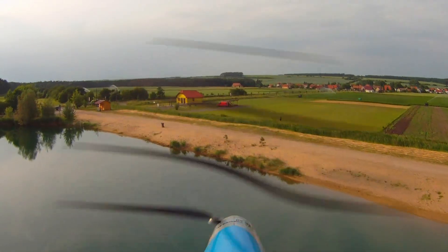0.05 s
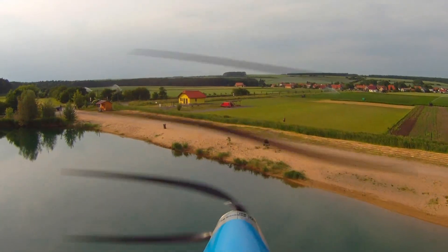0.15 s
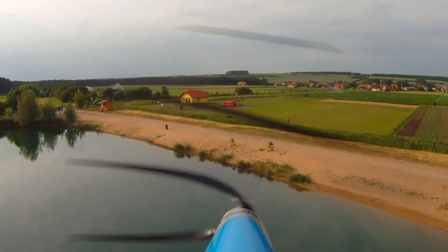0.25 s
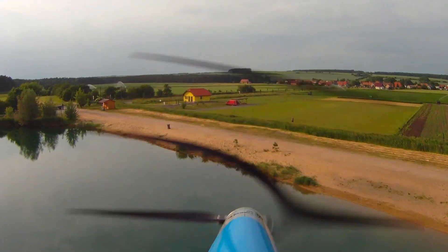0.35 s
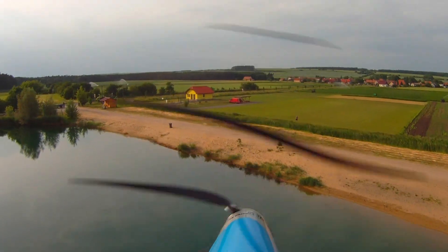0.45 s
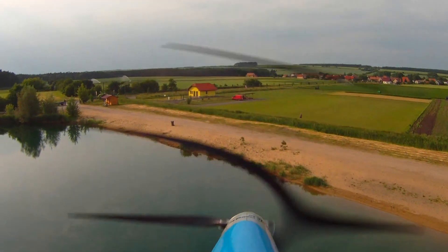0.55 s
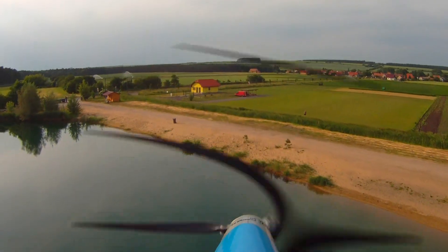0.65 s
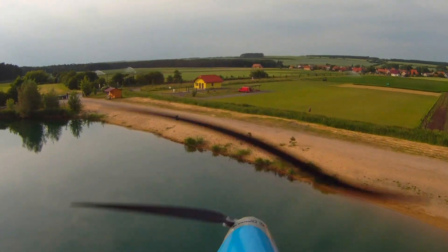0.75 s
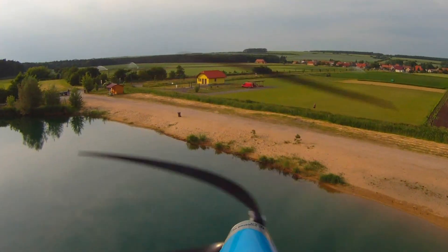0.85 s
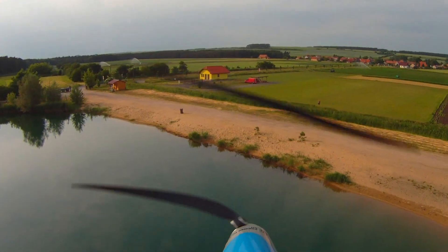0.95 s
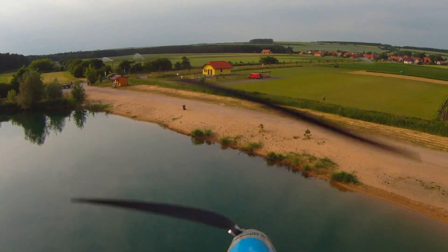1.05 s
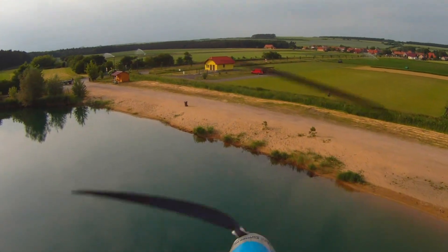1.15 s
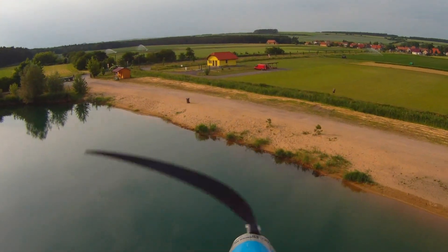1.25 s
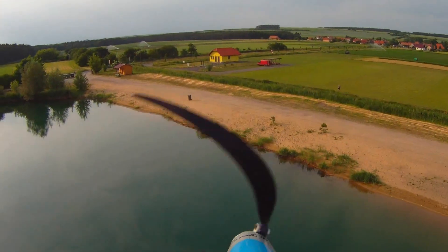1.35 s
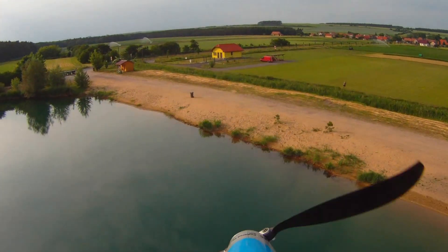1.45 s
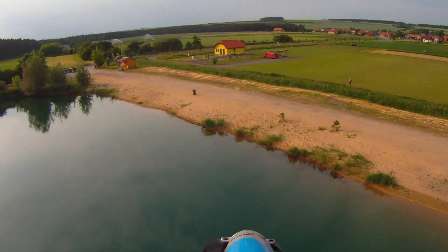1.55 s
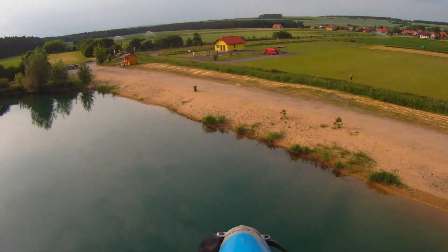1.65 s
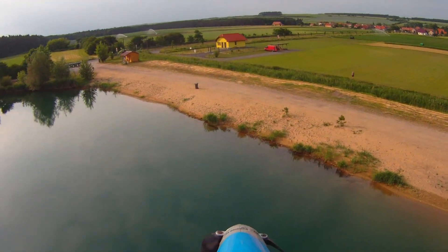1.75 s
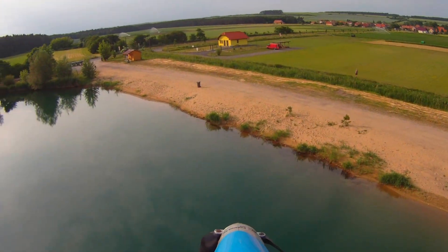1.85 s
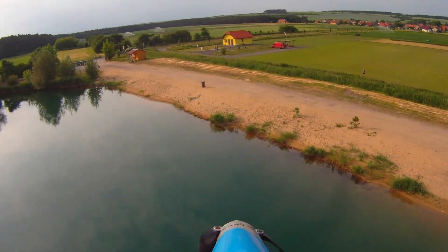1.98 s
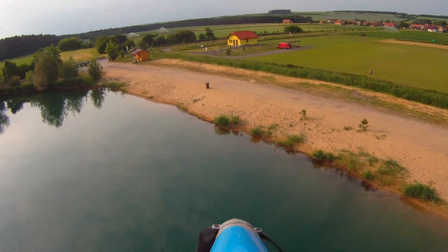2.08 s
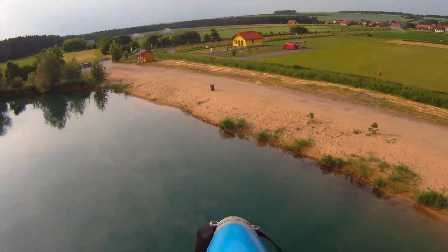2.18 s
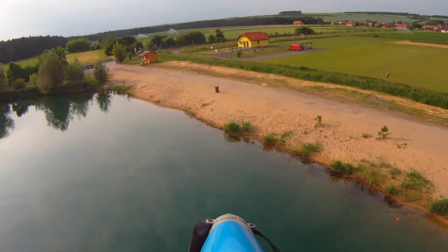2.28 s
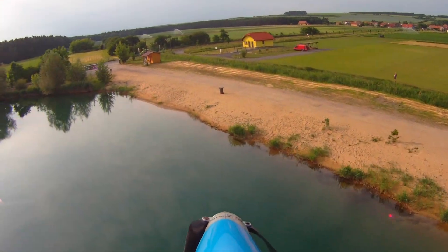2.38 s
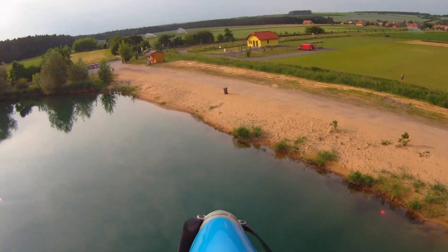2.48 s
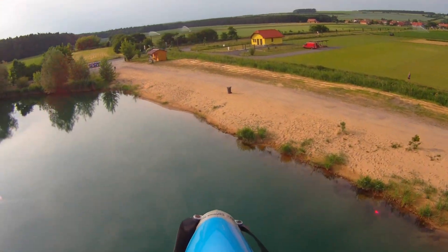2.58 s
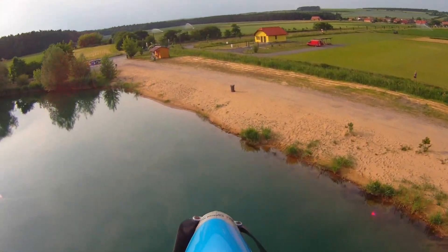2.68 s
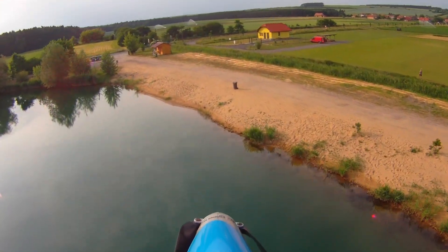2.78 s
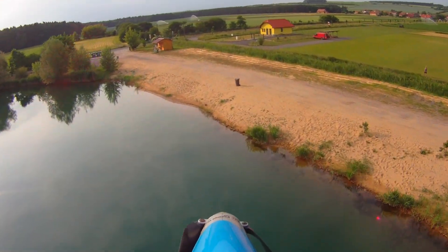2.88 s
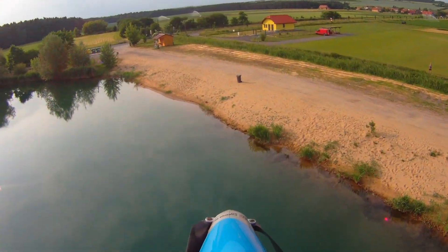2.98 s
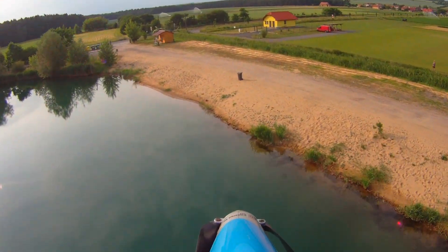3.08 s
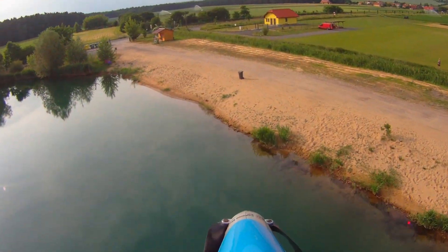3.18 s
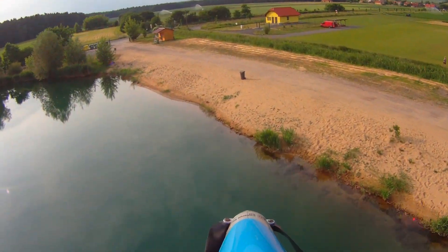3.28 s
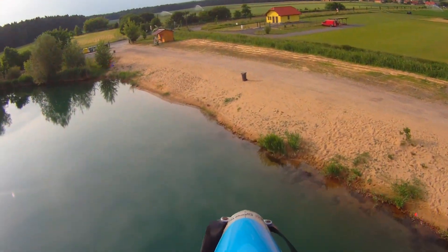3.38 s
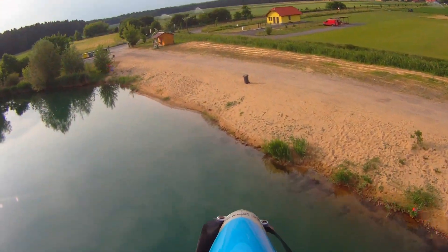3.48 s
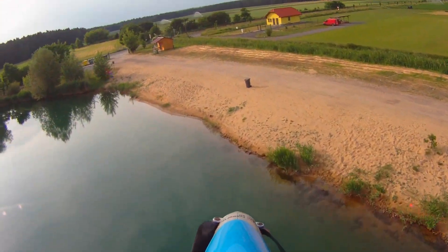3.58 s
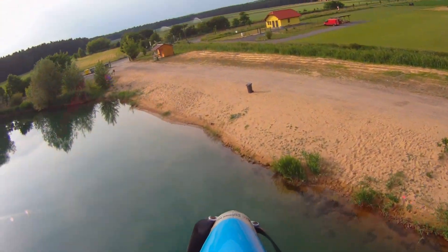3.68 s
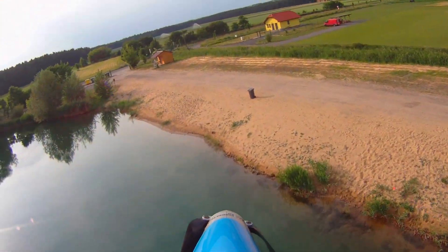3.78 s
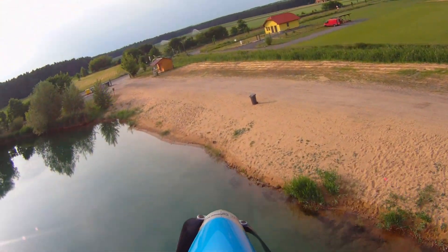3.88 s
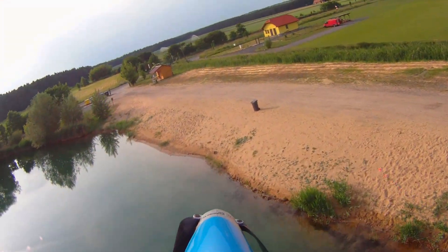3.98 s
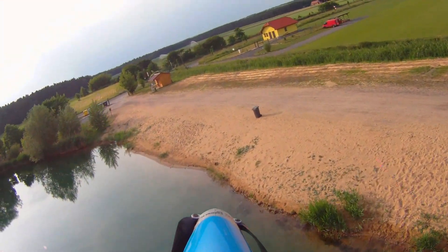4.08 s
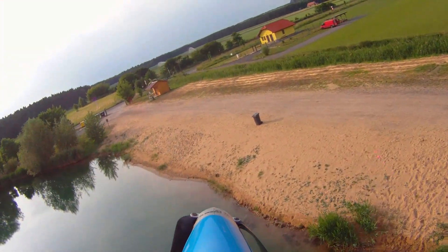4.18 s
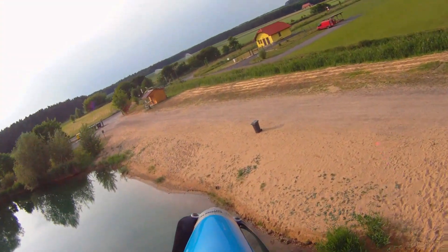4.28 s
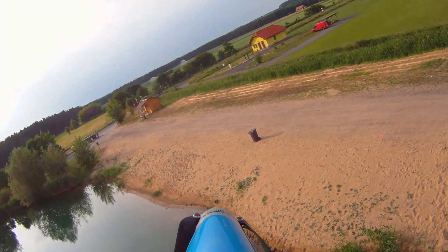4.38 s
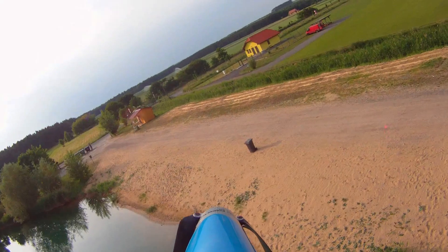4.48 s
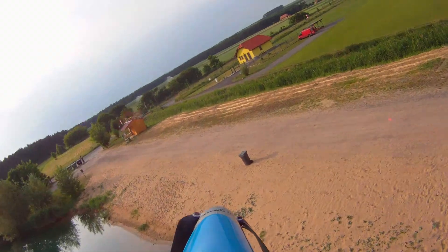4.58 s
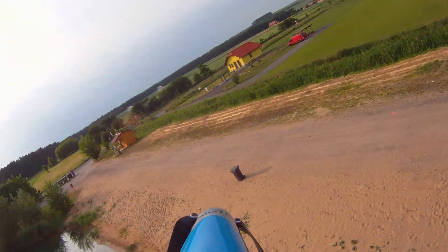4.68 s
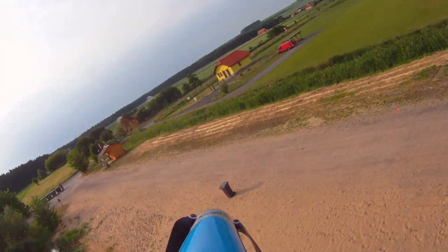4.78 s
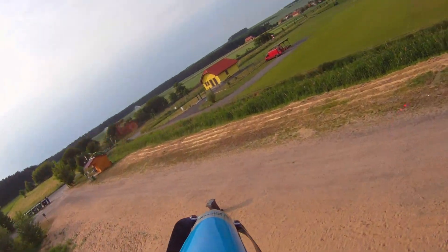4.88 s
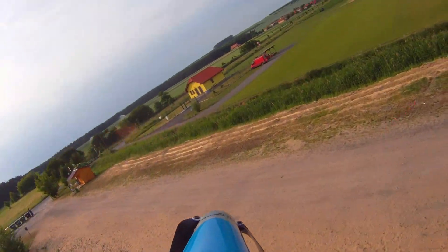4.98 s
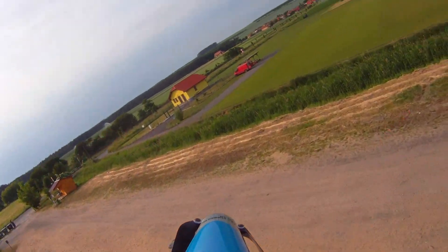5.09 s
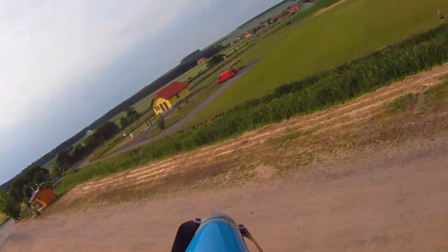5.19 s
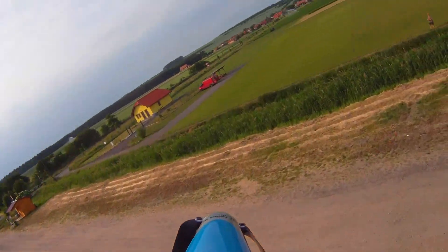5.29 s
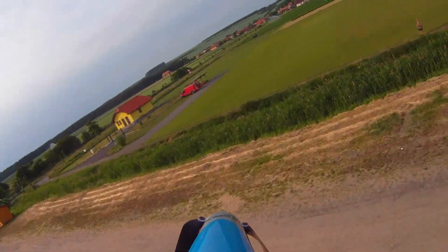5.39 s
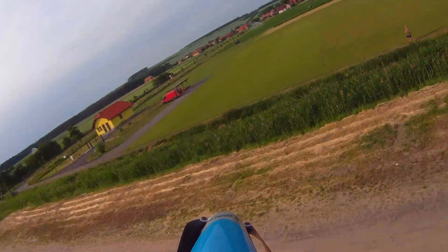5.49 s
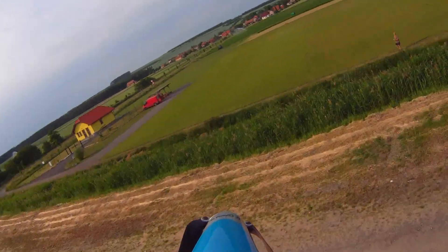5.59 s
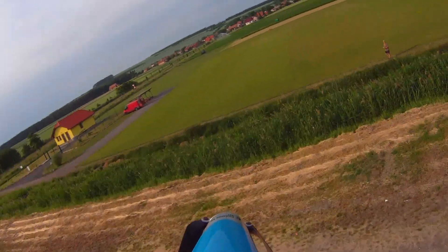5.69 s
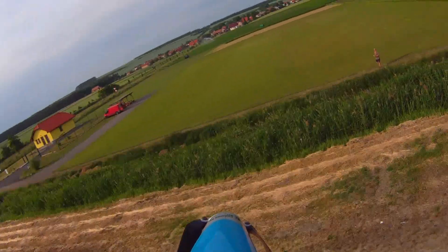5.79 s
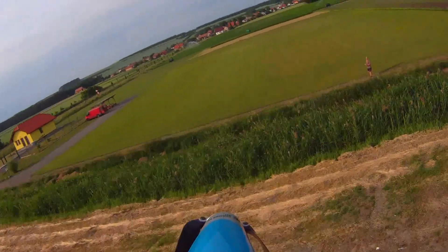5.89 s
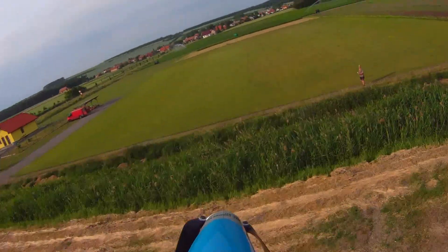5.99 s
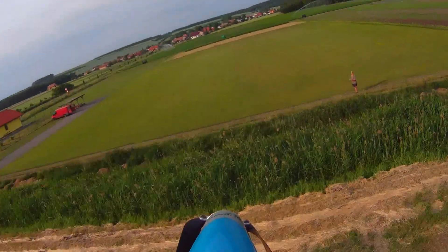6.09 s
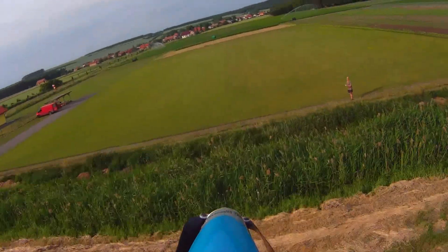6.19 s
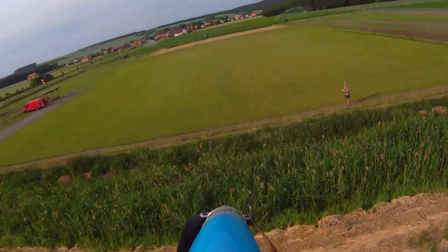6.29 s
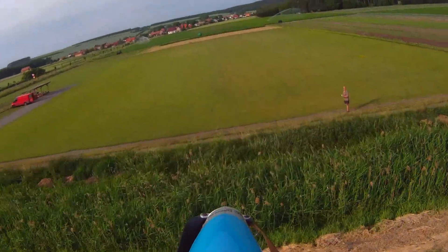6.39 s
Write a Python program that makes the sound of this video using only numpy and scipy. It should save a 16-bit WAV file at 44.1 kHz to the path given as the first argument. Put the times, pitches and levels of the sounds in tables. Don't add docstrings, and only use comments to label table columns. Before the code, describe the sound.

A buzzing model-plane motor with a thin high whistle loses power almost at once, its pitch falling and rattling to a standstill by about a second and a half. Soft foam thuds and small gritty clicks mark the folding blades. The glide that follows is windy, close and boxy, heard from a microphone encased on the plane, with turbulence swelling and easing over a constant hiss and hum.

```python
import sys
import numpy as np
from scipy import signal
from scipy.io import wavfile
from scipy.ndimage import uniform_filter1d

SR = 44100
rng = np.random.default_rng(int(sys.argv[2]) if len(sys.argv) > 2 else 0)


def to_wav(s):
    ch = np.atleast_2d(s).T
    pcm = np.round(np.clip(ch, -1, 1) * 32767)
    wavfile.write(sys.argv[1], SR, pcm.astype(np.int16))


def volts_from_decibels(level):
    exponent = np.asarray(level, float) / 20
    return 10 ** exponent


N = 284445
MOTOR_N = int(1.7 * SR)


def rms_one(x):
    return x / np.sqrt(np.mean(x ** 2) + 1e-20)


def in_time(rows):
    s, *columns = np.transpose(rows)
    return [np.interp(np.arange(N) / SR, s, c) for c in columns]


def ramp(start_s, length_s):
    return np.clip((np.arange(N) / SR - start_s) / max(length_s, 1e-3), 0, 1)


def drift(rate_hz):
    r = np.exp(-128 * np.pi * rate_hz / SR)
    slow = signal.lfilter([1], [1, -2 * r, r * r], rng.standard_normal(N // 64 + 502))[500:]
    return np.interp(np.arange(N) / 64, np.arange(len(slow)), rms_one(slow))


def band(x, low_hz, high_hz, order=2):
    return signal.sosfilt(signal.butter(order, [low_hz, high_hz], "band", fs=SR, output="sos"), x)


def resonate(force, modes, direct_db):
    out = volts_from_decibels(direct_db) * force
    for k, (hz, width_hz, level_db) in enumerate(modes):
        r = np.exp(-np.pi * width_hz / SR)
        ring = signal.lfilter([1, 0, -1], [1, -2 * r * np.cos(2 * np.pi * hz / SR), r * r], force)
        out = out + (-1) ** k * volts_from_decibels(level_db) * (1 - r * r) / 2 * ring
    return out


def rush(spectrum, ref_hz, shared_db, patchy_db):
    points_hz, levels_db = np.transpose(spectrum)
    count = int(3 * np.log2(points_hz[-1] / points_hz[0]))
    edges_hz = np.geomspace(points_hz[0], points_hz[-1], count)
    out, together, white = 0, drift(84), rng.standard_normal((2, N))
    for k, (low_hz, high_hz) in enumerate(zip(edges_hz, edges_hz[1:])):
        level_db = np.interp(np.log(low_hz * high_hz) / 2, np.log(points_hz), levels_db)
        narrow = band(band(white[k % 2], low_hz, high_hz), low_hz * .9, high_hz * 1.1)
        flicker_db = shared_db * together + patchy_db * drift(11.1)
        out = out + volts_from_decibels(level_db + flicker_db) * narrow
    return out / np.std(band(out, *ref_hz))


SWITCH_HZ = 8021.5


def tones(lines, turns, waver_db):
    t, out = np.arange(len(turns)) / SR, 0
    for switch, order, level_db in lines:
        phase = 2 * np.pi * (switch * SWITCH_HZ * t + order * turns + rng.random())
        out = out + volts_from_decibels(level_db + waver_db * drift(22)[:len(t)]) * np.sin(phase)
    return out


def shaft_tones(orders, turns, waver_db):
    return tones([(0, order, level_db) for order, level_db in orders], turns, waver_db)


# (time [s], speed [turns/s])
SPEED = [
    (.2, 172.57),
    (.265, 168),
    (.445, 125),
    (.57, 108.5),
    (.82, 90.5),
    (.97, 73.5),
    (1.1, 69.5),
    (1.3, 54),
    (1.5, 30),
]
# (time [s], magnet pull [dB], rocking [dB])
ROTOR = [
    (.3, -39, -62),
    (.42, -45, -49),
    (.535, -49.5, -43),
    (.585, -46.5, -46.5),
    (.68, -47, -38.5),
    (.9, -45, -52),
    (1.08, -36, -34.5),
    (1.33, -53.5, -50),
    (1.49, -50, -55),
]
INERTIA_S = .05
STOP_S, STOP_FADE_S = 1.54, 0.05


def rotor():
    speed_hz = uniform_filter1d(in_time(SPEED)[0], size=int(INERTIA_S * SR), mode="nearest")
    octaves = np.log2(speed_hz / speed_hz[0])
    return speed_hz, octaves, *in_time(ROTOR), -50 * ramp(STOP_S, STOP_FADE_S)


# (frequency [Hz], density [dB/Hz])
HISS = [(30, -51), (60, -46.5), (160, -21), (300, -15.5), (1100, -15), (2200, -19), (3000, -25.5),
        (4200, -24.5), (5400, -26), (6300, -29), (8500, -33.5), (11000, -42.5), (12700, -43)]
HISS_DB, HISS_FOLLOWS = -58, 0.28
CALM_DB, PROP_HISS_DB = -70, -55.5


def boundary_hiss(eddy_db, octaves, stop_db):
    smooth = volts_from_decibels(HISS_DB + HISS_FOLLOWS * (np.maximum(eddy_db, CALM_DB) + 48.5))
    gain = np.hypot(smooth, volts_from_decibels(PROP_HISS_DB + 2.7 * octaves + stop_db))
    hiss = rush(HISS, (2800, 5500), shared_db=1.34, patchy_db=-0.48)
    cavity = band(band(rng.standard_normal(N), 4480, 5070), 4120, 5500)
    return volts_from_decibels(-1.5) * gain * (hiss + volts_from_decibels(-3.5) * rms_one(cavity))


# (frequency [Hz], width [Hz], level [dB])
WING_HUM = [
    (1271.6, 31.5, 4),
    (1407, 29, 2.5),
    (1500, 66, -4),
    (1612, 143, -5.5),
    (2004, 420, -11.5),
]
HUM_DB, PROP_HUM_DB, HUM_PER_OCTAVE_DB = -48, -45, 9
SHAKE_HUM_DB = 2
HUM_YIELDS = 0.095


def wing_hum(eddy_db, octaves, magnet_db, stop_db):
    propeller = volts_from_decibels(PROP_HUM_DB + HUM_PER_OCTAVE_DB * octaves)
    driven = np.hypot(propeller, volts_from_decibels(magnet_db + SHAKE_HUM_DB)) * volts_from_decibels(stop_db)
    gain = np.hypot(volts_from_decibels(HUM_DB - HUM_YIELDS * (eddy_db + 53)), driven)
    pressure = volts_from_decibels(1.9 * drift(26)) * band(rng.standard_normal(N), 1087, 2740)
    return volts_from_decibels(-3.5) * gain * rms_one(resonate(pressure, WING_HUM, direct_db=-38))


# (frequency [Hz], density [dB/Hz])
WASH_COLOUR = [(2000, 2), (5000, -19), (6500, 5), (7500, -7), (10000, -14), (11500, -20), (15000, -23)]
WASH_DB, WASH_END_S, WASH_FADE_S = -74, .53, .07


def propeller_wash():
    pulling = 1 - ramp(WASH_END_S, WASH_FADE_S)
    return volts_from_decibels(WASH_DB + 14) * pulling * rush(WASH_COLOUR, (8500, 11000), shared_db=2.5, patchy_db=-2.0)


# (frequency [Hz], density [dB/Hz])
EDDIES = [(21, -59.5), (35, -31), (96, -20), (122, -28), (221, -22.5), (449, -0.5), (689, 4.5), (1200, 2),
          (1320, -1.5), (2270, -19.5), (3000, -19), (3900, -35.5), (6600, -120)]


def port_eddies(eddy_db, boom_db):
    eddies = volts_from_decibels(eddy_db - 2.5) * rush(EDDIES, (550, 1050), shared_db=-1.25, patchy_db=1.5)
    boom = rms_one(band(rng.standard_normal(N), 131, 730))
    return eddies + volts_from_decibels(eddy_db + boom_db - 10 + 1.2 * drift(30)) * boom


# (time [s], eddies [dB], boom re eddies [dB])
FLOW = [(0, -45.5, -2), (.6, -44.5, -17), (1.1, -46.5, 0.5), (1.6, -46.5, -4.5), (2.45, -45.5, -15),
        (2.73, -47.5, -13), (2.77, -54.5, 4), (3.25, -62, 9), (3.29, -50.5, -2), (3.85, -46, -21),
        (3.96, -50, -8), (3.99, -55, -1), (4.6, -63, 3.5), (5.21, -66, 0), (5.25, -50, 1),
        (5.65, -45.5, -30), (6.1, -46.5, 5.5), (6.45, -50, 4.5)]


def slipstream():
    eddy_db, boom_db = in_time(FLOW)
    _, octaves, magnet_db, _, stop_db = rotor()
    steady = boundary_hiss(eddy_db, octaves, stop_db) + wing_hum(eddy_db, octaves, magnet_db, stop_db)
    return port_eddies(eddy_db, boom_db) + steady + propeller_wash()


# (time [s], peak [dB], brightness [dB], ring [Hz], ring t60 [s])
KNOCKS = [(0.909, -33, -44, 1130, 0.032), (1.0405, -19, -40, 1420, .016), (1.068, -20, -40, 1410, .02),
          (1.0965, -19, -40, 1390, .024), (1.085, -26, -41, 1355, 0.05), (1.261, -43, -30, 1410, 0.026),
          (1.387, -35, -29, 1350, 0.034), (1.4782, -28.5, -30, 1390, .033), (1.513, -36, -30, 1400, 0.048),
          (1.553, -44, 4, 1280, .02), (1.735, -37.5, -26, 1400, 0.1), (1.747, -29.5, -20, 1500, 0.013),
          (1.7545, -33, 0, 2240, 0.036), (1.756, -23.5, -20, 1360, 0.058), (1.783, -34.5, 1.5, 2070, .039),
          (1.79, -29.5, -19, 1364, .04), (1.819, -36, -14, 1025, 0.013), (1.918, -36, -30, 1390, 0.056)]
GIVE_S, GIVE_S_PER_DB = .004, .0003


def knocks():
    out, t = np.zeros(N), np.arange(4000) / SR
    grits = rng.standard_normal((len(KNOCKS), 4000))
    for (s, peak_db, bright_db, ring_hz, t60_s), grit in zip(KNOCKS, grits):
        rise_s = max(GIVE_S + GIVE_S_PER_DB * (peak_db + 22), .0015)
        swell = np.sin(np.pi / 2 * np.minimum(t / rise_s, 1)) ** 2
        decay = volts_from_decibels(-60 * np.maximum(t - rise_s, 0) / t60_s)
        ring = swell * decay * np.sin(2 * np.pi * ring_hz * t)
        crack = volts_from_decibels(bright_db) * band(grit * swell * np.exp(-t / 0.0044), 1500, 7000)
        at = int(s * SR)
        out[at:at + len(t)] += volts_from_decibels(peak_db) * (ring + crack)
    return out


# (shaft order, level [dB])
BLADE_ORDERS = [
    (1, -9.5),
    (2, 1),
    (3, -6),
    (.5, -14.5),
]
THRUM_DB, THRUM_PER_OCTAVE_DB = -55, 8.5


def blade_thrum(turns, octaves, stop_db):
    gain = volts_from_decibels(THRUM_DB + THRUM_PER_OCTAVE_DB * octaves + stop_db)
    return gain * shaft_tones(BLADE_ORDERS, turns, waver_db=-3.5)


RATTLE_DB, RATTLE_PER_OCTAVE_DB = -43.5, 2.5


def bearing_rattle(turns, octaves, stop_db):
    level_db = RATTLE_DB + RATTLE_PER_OCTAVE_DB * octaves + stop_db
    slap = 1 + .9 * np.cos(2 * np.pi * turns)
    return volts_from_decibels(level_db + 1.5 * drift(60)[:MOTOR_N]) * slap * rng.standard_normal(MOTOR_N)


# (multiple of switching tone, shaft order, level [dB])
DRIVE_LINES = [(0, 7, -6), (0, 7.3, -5.5), (0, 8, 3), (0, 9.71, -3.5), (0, 12, 3.5), (0, 13, -9),
               (0, 15, -14), (0, 21, -7), (0, 34, -19), (0, 35, -14.5), (0, 36, -23), (0, 42, -13.5),
               (1, -42, -8), (1, -38, -11.5), (1, -35, -11), (1, -36, -20), (1, -14, -18.5),
               (1, -13.5, -16.5), (1, -10.5, -12.5), (1, -7, -28), (-1, 63, -16.5), (-1, 84, -10)]
CURRENT_DB, CUT_S, CUT_DB_PER_S, IDLE_DB = -40.5, 0.26, 204, -90


def drive_current(turns, stop_db):
    fall_db = CUT_DB_PER_S * (np.arange(MOTOR_N) / SR - CUT_S)
    drive_db = np.clip(CURRENT_DB - fall_db, IDLE_DB, CURRENT_DB) + stop_db
    current = volts_from_decibels(drive_db + 2.5) * tones(DRIVE_LINES, turns, waver_db=2.0)
    sizzle = current * volts_from_decibels(np.clip(.7 * (drive_db[0] - drive_db), 0, 14))
    return band(current, 300, 3300) + band(sizzle, 5830, 6950, order=6)


# (shaft order off the whistle, level [dB])
SWITCH_SIDES = [
    (0, 1),
    (-7, -20.5),
    (-14, -17.5),
    (7, -21),
]
WHISTLE_DB, BRAKE_WHISTLE_DB = -64, -69
PAUSE_S, PAUSE_LENGTH_S, RETURN_S = .39, .07, .1
BRAKE_SWELL_DB, BRAKE_FADE_S = 6, 0.15


def switching_whistle(turns, octaves, magnet_db):
    driving = 1 - ramp(PAUSE_S - .02, 0.018)[:MOTOR_N]
    braking = ramp(PAUSE_S + PAUSE_LENGTH_S, RETURN_S)[:MOTOR_N]
    taper = 1 - ramp(STOP_S + STOP_FADE_S - BRAKE_FADE_S, BRAKE_FADE_S)[:MOTOR_N]
    swell = volts_from_decibels(-BRAKE_SWELL_DB * np.clip(octaves + 1, -.5, .5) * braking)
    gain = (volts_from_decibels(WHISTLE_DB) * driving + volts_from_decibels(BRAKE_WHISTLE_DB) * braking) * taper * swell
    lines = [(1, order, level_db) for order, level_db in SWITCH_SIDES]
    carrier = tones(lines[:1], turns, waver_db=1.0)
    sides = volts_from_decibels(np.minimum(magnet_db + 43, 3)) * tones(lines[1:], turns, waver_db=2.5)
    return volts_from_decibels(17) * gain * (carrier + sides)


# (shaft order, level [dB])
MAGNET_ORDERS = [(7, 5), (14, 5), (15, -17), (18, -2.5), (21, -6), (24.5, -8), (28, -30), (35, -5.5),
                 (36, -11), (38, -11.5)]
# (shaft order, level [dB])
PLAY_ORDERS = [(6, -2.5), (6.5, -3), (12, 4.5), (12.5, 3), (15.5, -17.5), (19, -14), (20, -11.5),
               (20.5, -7.5), (21.5, -8), (22, -19)]
WOBBLE = .4


def magnet_force(turns, magnet_db, play_db):
    pull = volts_from_decibels(magnet_db - 7.0) * shaft_tones(MAGNET_ORDERS, turns, waver_db=1.0)
    pull *= 1 + WOBBLE * ramp(PAUSE_S, RETURN_S)[:MOTOR_N] * np.cos(np.pi * turns)
    return pull + volts_from_decibels(play_db - 10.0) * shaft_tones(PLAY_ORDERS, turns, waver_db=3.5)


# (frequency [Hz], width [Hz], level [dB])
AIRFRAME = [(426, 69, 4.5), (783, 270, -7.5), (1127, 41, 6), (1264, 100, 9), (1390, 95, 17.5),
            (1633, 70, 15), (1722, 52, 13.5), (2080, 130, 9), (2303, 24, 12), (2592, 39, 17.5)]


def motor():
    speed_hz, octaves, magnet_db, play_db, stop_db = (c[:MOTOR_N] for c in rotor())
    magnet_db, play_db = magnet_db + stop_db, play_db + stop_db
    turns = np.cumsum(speed_hz) / SR
    rattle = bearing_rattle(turns, octaves, stop_db)
    force = magnet_force(turns, magnet_db, play_db) + band(rattle, 300, 4100)
    shaken = band(resonate(force, AIRFRAME, direct_db=-11.0), 250, 1970)
    direct = volts_from_decibels(-5.5) * band(rattle, 5700, 6600) + blade_thrum(turns, octaves, stop_db)
    direct = direct + drive_current(turns, stop_db) + switching_whistle(turns, octaves, magnet_db)
    return np.pad(shaken + direct, (0, N - MOTOR_N))


def scene():
    return (slipstream() + knocks() + motor())[None]


def low_pass(x):
    return signal.sosfilt(signal.butter(12, 15140, fs=SR, output="sos"), x)


PORT_HZ, PORT_LOSS_DB = 6480, -14


def record(dry):
    passed = signal.sosfiltfilt(signal.butter(10, PORT_HZ, fs=SR, output="sos"), dry)
    return low_pass(passed + volts_from_decibels(PORT_LOSS_DB) * (dry - passed))


dry = scene()
out = record(dry)
to_wav(out)
```